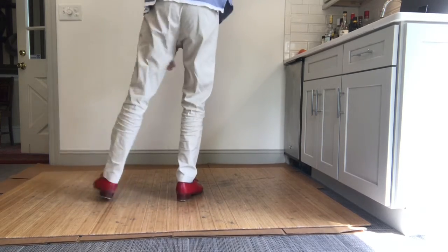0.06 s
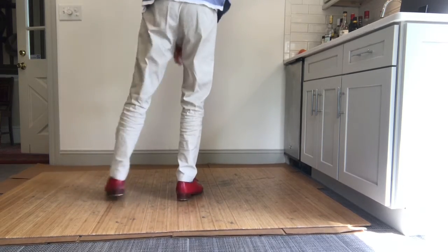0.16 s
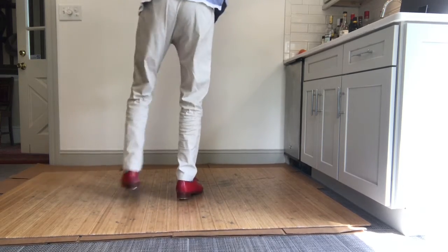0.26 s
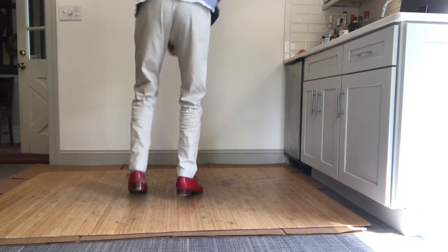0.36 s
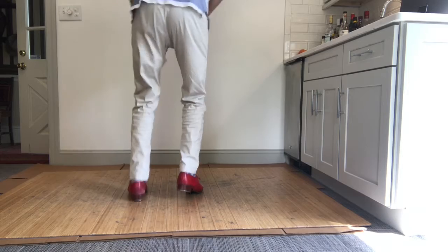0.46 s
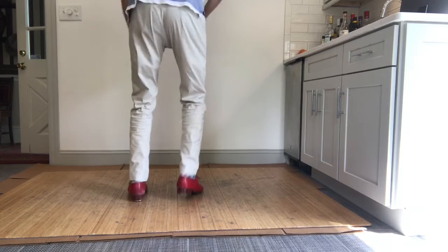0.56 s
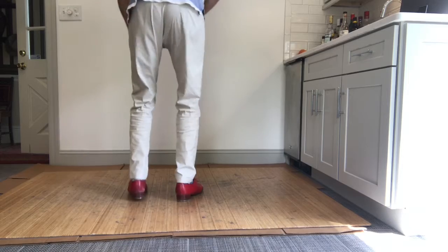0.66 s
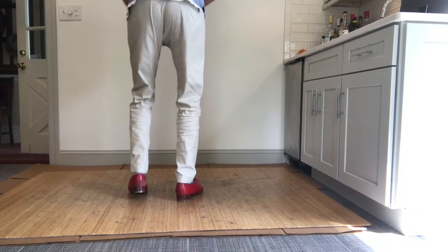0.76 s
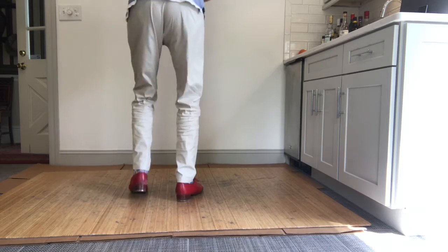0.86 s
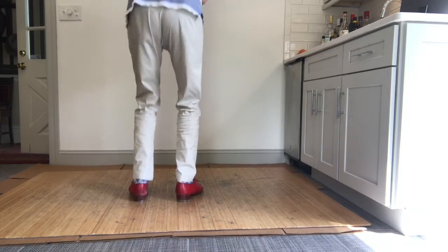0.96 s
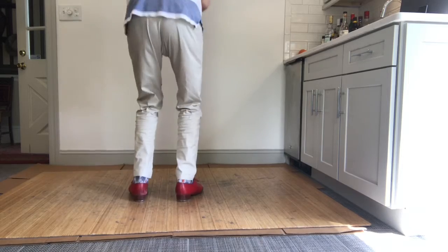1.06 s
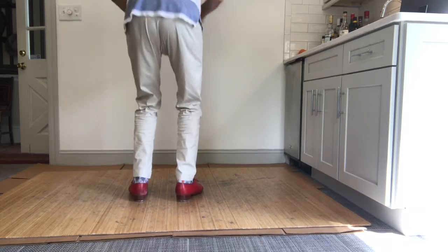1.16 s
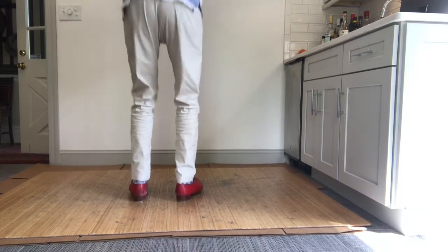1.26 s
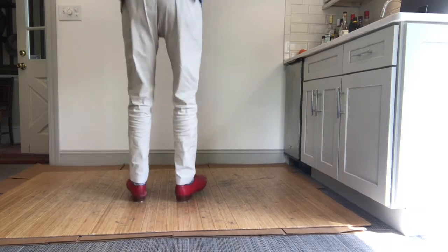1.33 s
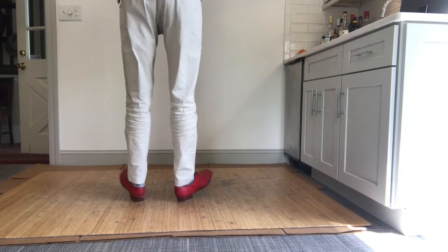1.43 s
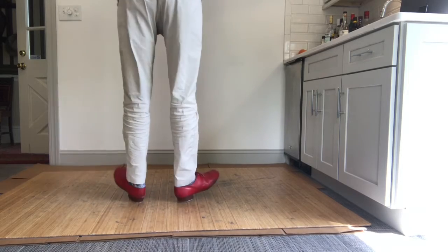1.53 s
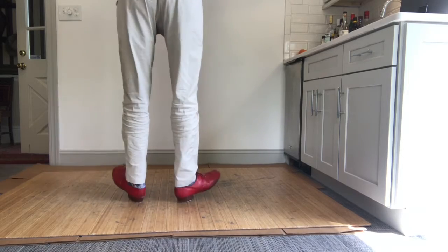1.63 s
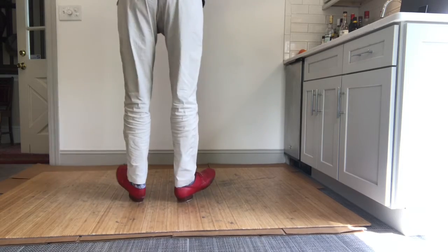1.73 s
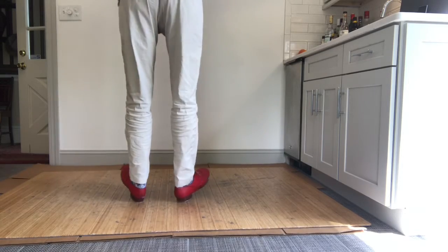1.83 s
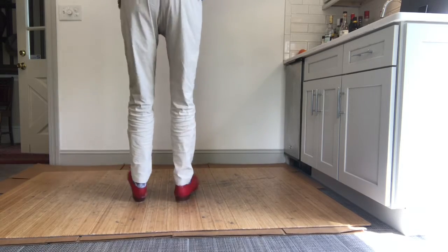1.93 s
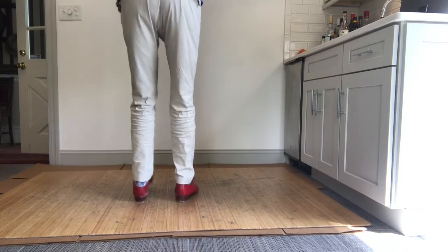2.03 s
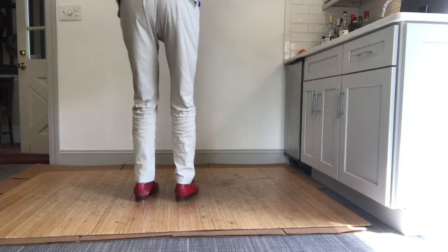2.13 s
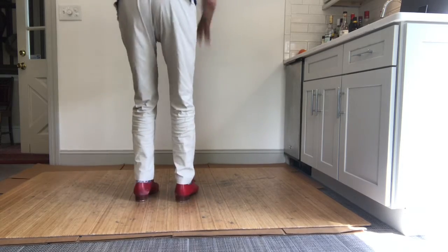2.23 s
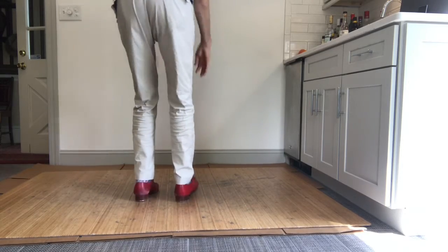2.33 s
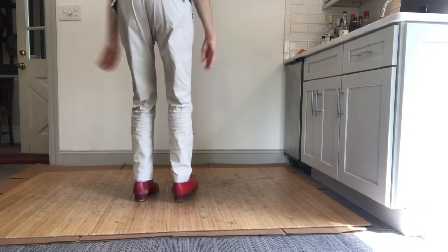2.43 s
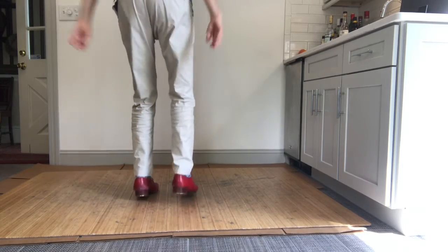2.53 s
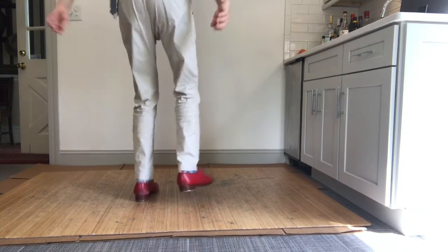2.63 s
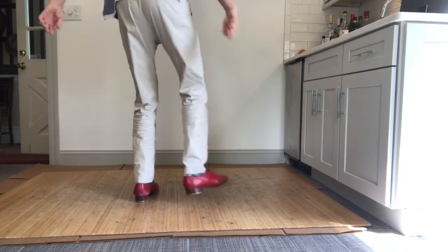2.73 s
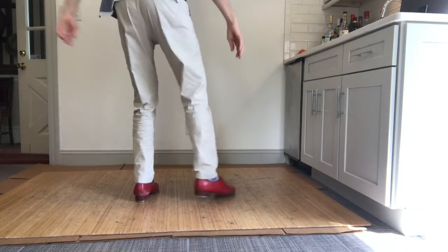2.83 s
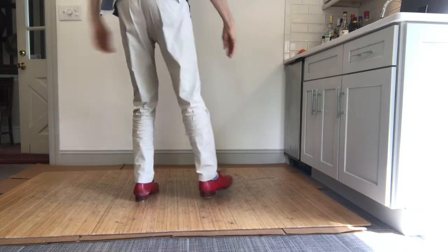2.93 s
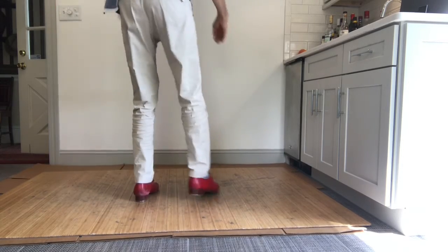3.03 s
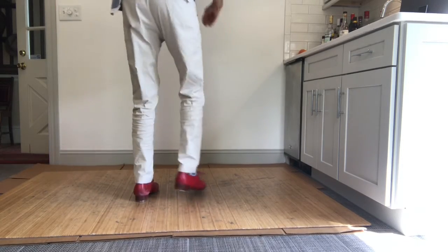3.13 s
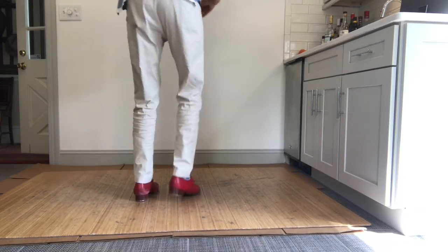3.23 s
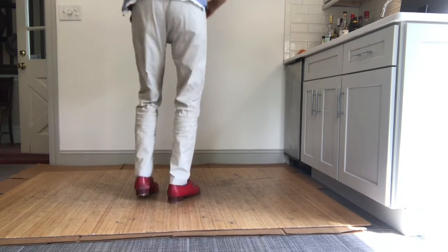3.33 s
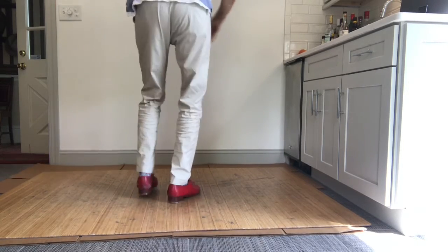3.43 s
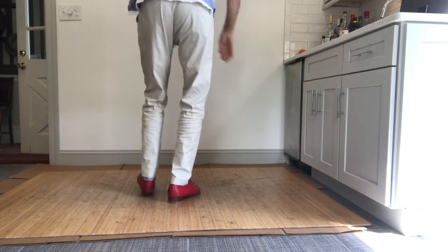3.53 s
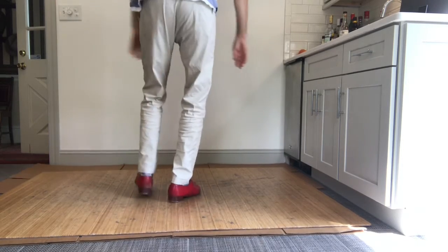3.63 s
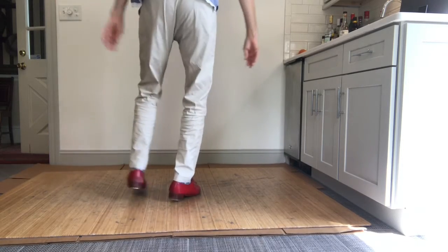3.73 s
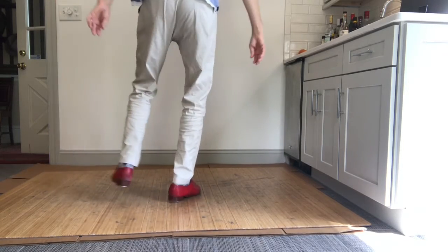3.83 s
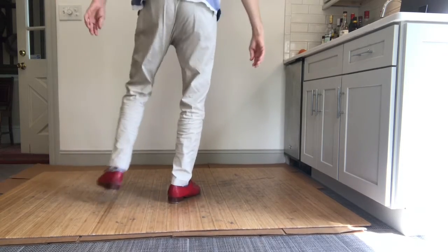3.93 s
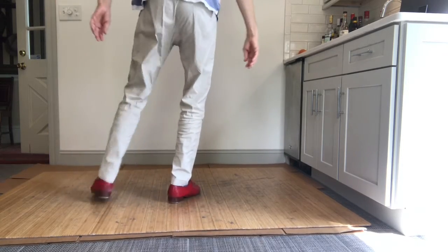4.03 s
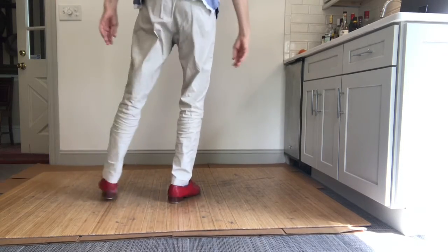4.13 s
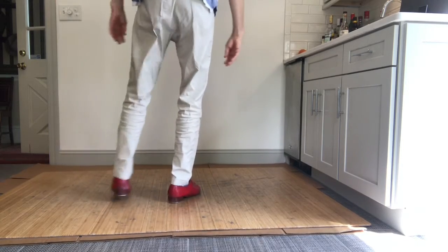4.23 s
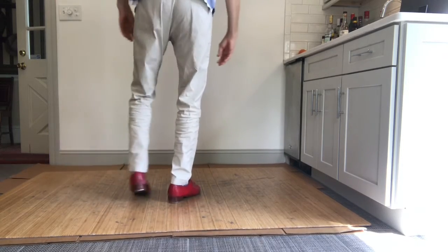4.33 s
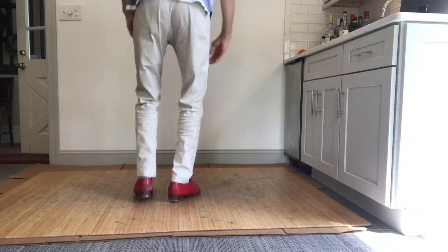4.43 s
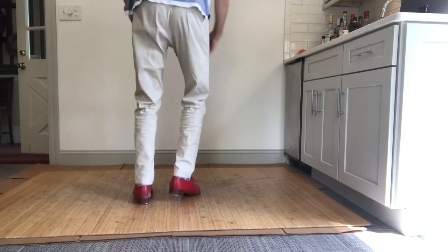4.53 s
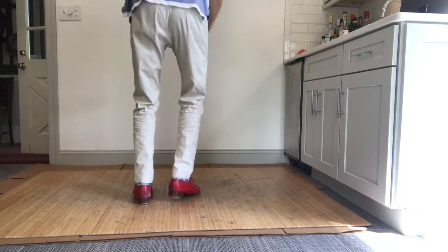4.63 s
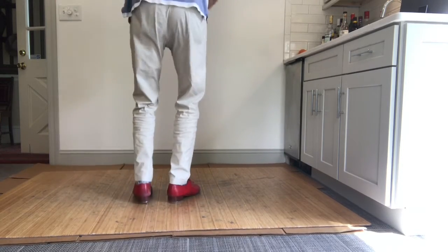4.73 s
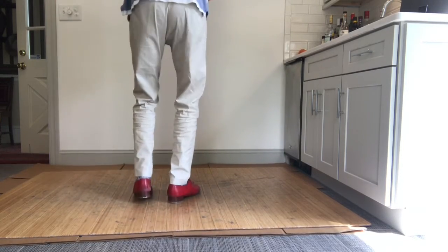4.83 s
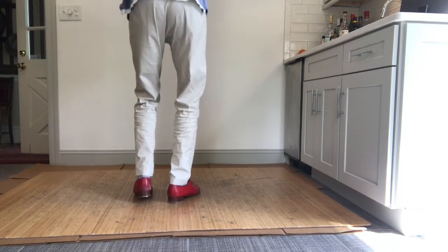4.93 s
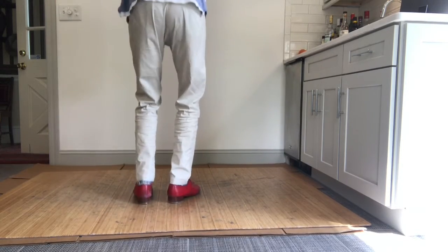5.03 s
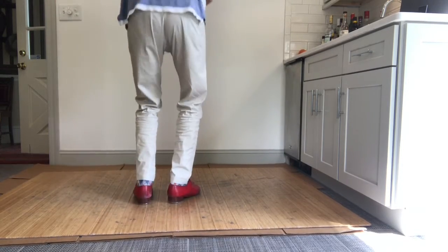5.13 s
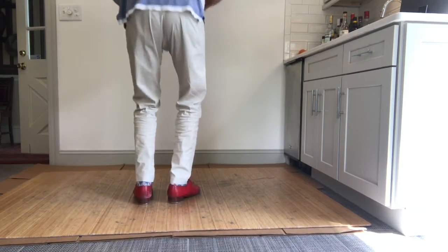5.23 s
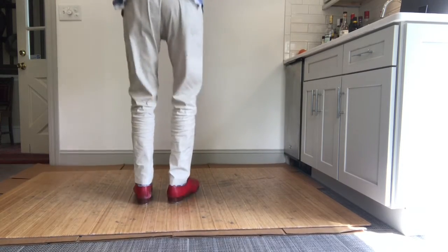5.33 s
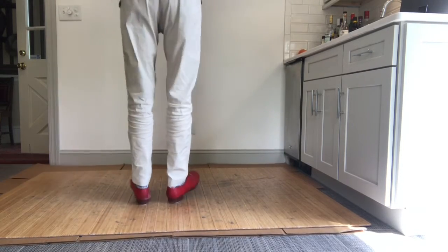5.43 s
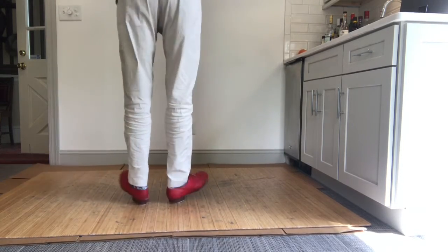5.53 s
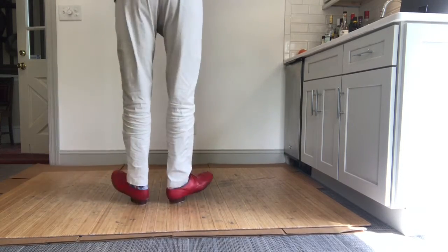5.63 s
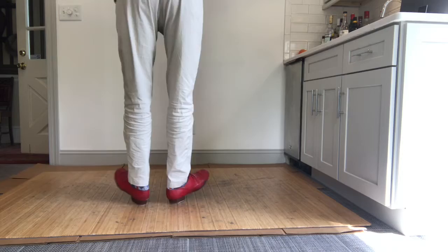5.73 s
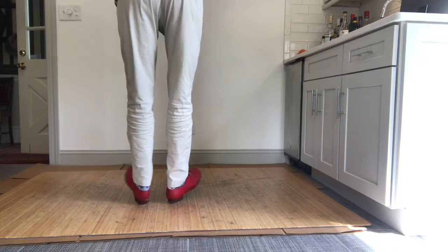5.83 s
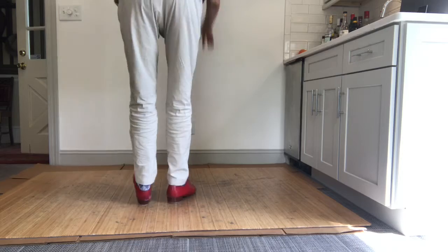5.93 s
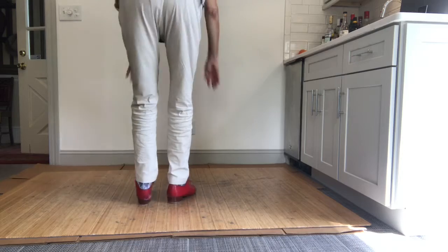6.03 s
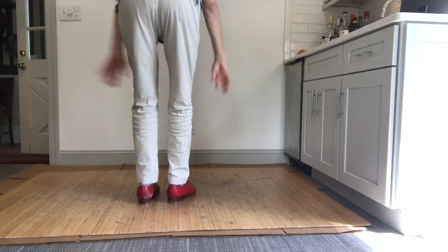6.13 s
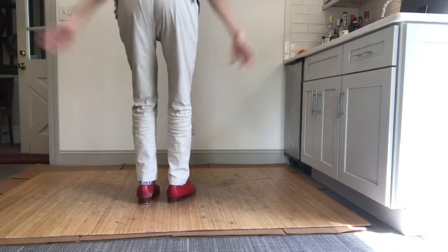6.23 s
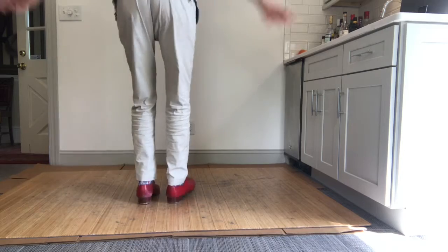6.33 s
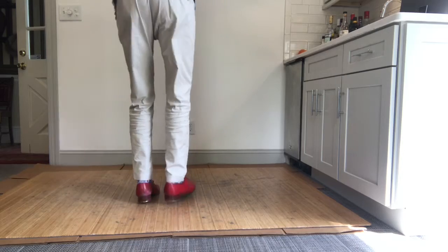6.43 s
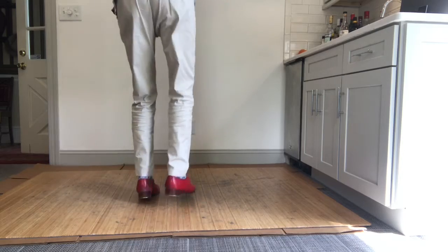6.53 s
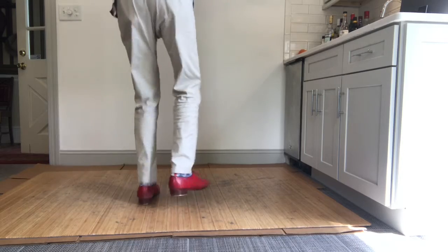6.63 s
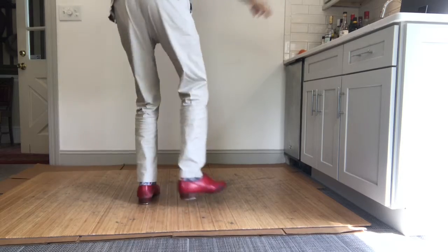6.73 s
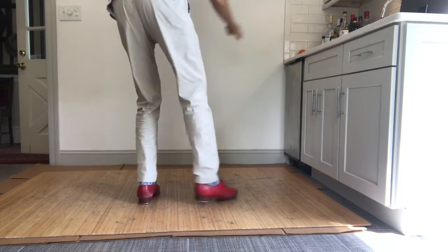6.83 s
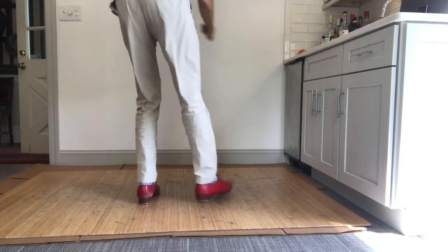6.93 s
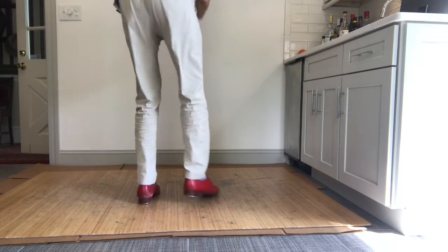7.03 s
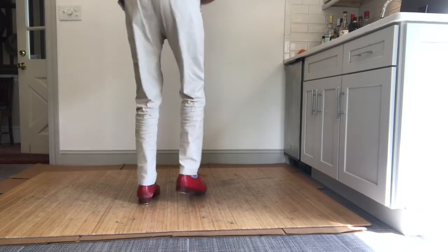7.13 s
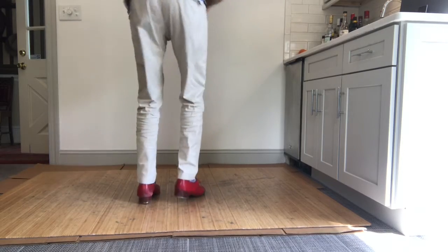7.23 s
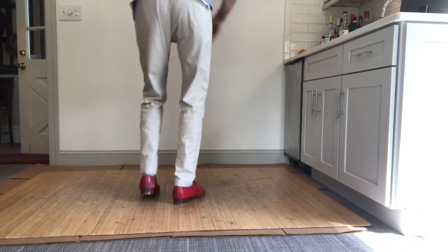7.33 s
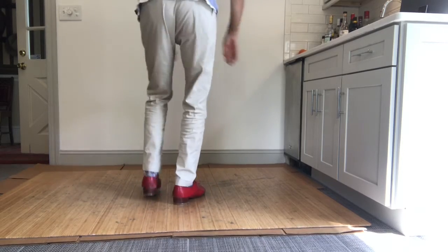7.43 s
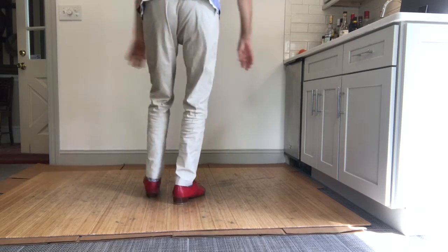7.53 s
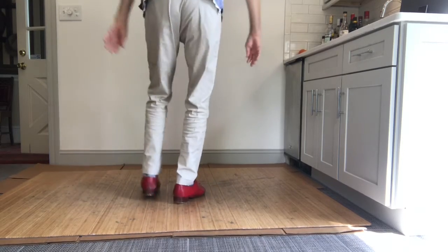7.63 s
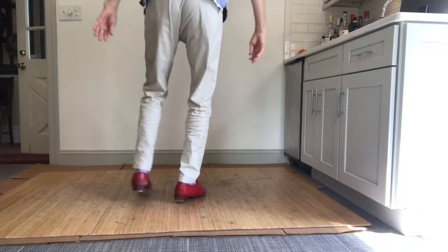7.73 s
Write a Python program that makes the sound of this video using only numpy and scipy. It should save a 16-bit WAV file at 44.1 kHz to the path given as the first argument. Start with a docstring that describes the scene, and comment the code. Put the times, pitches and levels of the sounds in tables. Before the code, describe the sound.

In a hard-walled kitchen, a dancer's steel-plated shoes clatter on wood a few metres from the microphone. A short run of taps gives way to soft ticking and scraping, then comes a longer, even run. After another pause of scraping soles and one slight squeak, the tapping resumes. Heel drops thump the floor, and each tap rings briefly in the room over quiet air and an appliance hum.

```python
"""Tap shoes clatter on a slatted wooden mat in a hard-walled kitchen, a few metres away.
Each impact excites damped modes: the steel plate chatters, the slats knock, and heavy steps shake
the floor joists. In the pauses the shoes swivel: the plates tick, and friction makes the soles
scrape and once squeak. The walls return the taps and ticks as echoes and reverberation, over a
murmur of air and a faint mains hum."""
import sys
import numpy as np
from scipy import signal
from scipy.fft import rfft, irfft, next_fast_len
from scipy.io import wavfile
from scipy.ndimage import uniform_filter1d

SR = 44100
rng = np.random.default_rng(int(sys.argv[2]) if len(sys.argv) > 2 else 0)


def wrap_up_sound(samples):
    """Save the sound to the file named by the first command line argument, as 16-bit audio."""
    columns = np.atleast_2d(samples).T
    # keep every value between -1 and 1, then stretch to whole-number steps
    tamed = np.clip(columns, -1, 1)
    steps = np.round(tamed * 32767).astype(np.int16)
    wavfile.write(sys.argv[1], SR, steps)


N = 343098

# Blows of the shoes. Each row: start in seconds, clank in Hz, clack in Hz, level in dB; then, with
# dB relative to that level, clack in dB, mat in dB, slat in dB and Hz, sole in dB and Hz, ring in
# dB and Hz, edge in dB; last, the weight on the floor in dB, independent of that level.
TAPS = [(-.14, 3900, 700, -7.5, -3, -16, -11, 690, -1.5, 1500, 2, 5870, -13, -50),
        (0.0339, 4250, 1050, -7.5, -6, -17.5, -6.5, 980, -35, 1290, -0.5, 5940, -5.5, -41),
        (.199, 4130, 785, -7, -5.5, -19, -15, 740, -10, 2180, 0, 5850, -11, -41),
        (0.3795, 4070, 590, -8.5, -14, -13, -6, 724, -3.5, 2230, 7.5, 5730, -8, -33),
        (0.5266, 4070, 770, -10, 3.5, -36, -1, 610, 0.5, 1490, 1, 6100, -12, -33),
        (0.6614, 3710, 1200, -7.5, -15, -17, -1, 1080, -11, 1330, 3.3, 5790, -10.5, -24.5),
        (1.0029, 3820, 710, -15, 8.5, -11, 7.5, 608, 6.5, 1340, 1.5, 5970, -17, -32),
        (2.011, 3920, 1050, -11, 4.5, -4.5, -13, 604, 1.5, 1254, -2, 5800, -18.5, -17),
        (2.177, 3400, 950, -31.5, 17.5, 7, 8, 695, 5, 1456, 2, 6170, -8.5, -21),
        (2.5245, 3920, 800, -7.5, 7, -9.5, -4.5, 599, -2, 1123, -0.5, 6030, -9, -23.5),
        (2.6926, 4500, 830, -12.5, 4, -24, -2.5, 880, -0.2, 1130, 1.5, 6160, -12, -25),
        (2.8708, 4500, 780, -7.5, -3, -17.5, -16.5, 877, -7, 1350, -1, 6500, -9, -32),
        (3.054, 3630, 630, -17.5, 1, -10.5, -1.5, 620, -2, 1230, 4.2, 5900, -8, -29.5),
        (3.225, 3350, 730, -9.5, 2, -13, -5, 563, -2.5, 1153, 1.5, 5600, -5.5, -33),
        (3.3662, 3140, 620, -20, -2, -11, 3.5, 583, 3, 1828, 6, 5700, -8, -42),
        (3.543, 3300, 580, -12, -5, -33, 1.5, 560, 4, 1767, 3, 5730, -13.5, -45),
        (3.7329, 4300, 710, -6.5, -6.5, -18.5, -5, 670, -8, 2080, 1, 5700, -14, -37),
        (3.8842, 3160, 1020, -17.5, 4.5, -34, 2, 778, 5.5, 1747, 0, 5670, -35, -38),
        (4.0504, 4330, 1020, -10.5, -2, -14.5, -20, 1106, -3, 1500, -1.3, 6100, -9.5, -41),
        (4.2322, 4170, 790, -15, 3, -11.5, -4.5, 572, -1.5, 1250, -5, 6600, -12.5, -52),
        (4.3987, 4100, 730, -9, -13, -18, -14, 634, -9, 2100, 3.5, 5570, -14.5, -39),
        (4.566, 3470, 860, -13, 7.5, -42, -2.5, 886, 3, 1340, 7, 5500, -8.5, -35),
        (4.734, 3400, 705, -17.5, 5, -12.5, 6.5, 585, 8.5, 1430, 5, 5840, -4.5, -26),
        (5.0962, 3560, 650, -13.5, 3.5, -12.5, -2, 534, 3, 1230, 4.5, 5570, -9, -30),
        (5.987, 3880, 500, -10.5, 2, -5, -25, 540, -1.5, 1160, -0.5, 5980, -15, -15),
        (6.1753, 4080, 700, -29, 10, 3, 8, 776, 8, 1210, 0, 5800, -15, -43),
        (6.1854, 4060, 545, -21.5, 13.5, -0.5, -1, 616, -8, 1340, 3, 5400, -17, -23.5),
        (6.5294, 3630, 910, -6, 5.5, -14.5, -8.5, 830, -4.5, 1262, -1, 5840, -13, -32),
        (6.678, 3870, 890, -12, 5.5, -14, 4, 799, -32, 995, 11, 5460, -5, -25),
        (6.8606, 3870, 540, -11.5, -11, -17.5, -4, 540, -5, 1385, 5, 5740, -7.5, -31),
        (7.0392, 4100, 573, -11.5, 4, -11, -5, 560, 0, 1190, 4.5, 5700, -5.5, -37),
        (7.216, 3460, 510, -8.5, -1, -17.5, -15, 547, -26, 2140, -0.5, 6100, -7.5, -28.5),
        (7.368, 4100, 1450, -10.5, -10, -16, -8, 1030, 1.5, 1720, 1.5, 5740, -15, -28),
        (7.5447, 3710, 880, -6, -8, -28, -4.5, 753, -4, 1800, 2.5, 5600, -16, -36),
        (7.7182, 4130, 760, -7, -20, -17.5, -6, 650, -31, 1340, 6.5, 5470, -12.5, -32)]
# Modes of the mat, the plate's edge, its highest tones and its body.
# Each row: frequency in Hz, 60 dB decay time (T60) in seconds, delay in seconds.
MAT_MODES = [(235.4, 0.087, 0.0017), (365, 0.034, 0.00217), (453, 0.021, 0.00093), (558, 0.027, 0.0012)]
EDGE_MODES = [(8000, .003, .001), (9500, .004, .0006)]
SIZZLE_MODES = [(11400, .0033, .0013), (13200, .0024, .0018)]
PLATE_MODES = [(4100, .003, 0), (3100, .002, .0035)]
SOLE_MODE = (2150, .005, .0008)
HEEL_DB = -11.5  # a mat level above this is a heel drop


def taps():
    """Impact excitation: the steel plate rings first, then the wooden slats beneath it."""
    out = np.zeros(N + 2 * SR)
    for (start, clank_hz, clack_hz, db, clack_db, mat_db, slat_db, slat_hz,
         sole_db, sole_hz, ring_db, ring_hz, edge_db, _) in TAPS:
        steel = np.vstack([
            damped_modes([(sole_hz, .008, .0005), SOLE_MODE], sole_db),
            clank(clank_hz, 7.5),
            damped_modes(PLATE_MODES, -1.5, detune=.086),
            damped_modes([(ring_hz / 1.127, .0021, .0006), (ring_hz * 1.096, .0021, .0009)], ring_db),
            damped_modes(EDGE_MODES, edge_db),
            damped_modes(SIZZLE_MODES, edge_db - 1.5),
            *pings(start)])
        knock = damped_modes([(slat_hz, .012, .0016), (1.19 * slat_hz, .008, .0016)], slat_db)
        free_slats = [(slat_hz, .05, .0016), (1.545 * slat_hz, .04, .0016), (2.15 * slat_hz, .03, .0016)]
        hollow = damped_modes(free_slats, slat_db - 15.5, spread_db=5, detune=.096)
        wood = np.vstack([damped_modes(MAT_MODES, mat_db), knock, hollow])
        clatter = chatter(rocking(steel, start)).sum(axis=0)
        add(out, start, amp(db) * echoes(clatter, WALL_ECHOES))
        clack = damped_modes([(clack_hz, .0065, .0019)], clack_db)  # the slat slaps down once
        add(out, start, amp(db) * echoes(clack[0], WALL_ECHOES))
        add(out, start, amp(db - .5) * echoes(wood.sum(axis=0), FLUTTER_ECHOES))
        wet_db = -29 + .51 * max(mat_db - HEEL_DB, 0)  # a heel drop fills the room more
        add(out, start, amp(db) * reverberation(np.vstack([steel, wood, amp(-6) * clack]), wet_db))
    return radiated(out[:N])


def clank(hz, db):
    """A heavily damped mode gives the plate a brief pitch."""
    return damped_modes([(hz, .003, .0009)], db)


def chatter(modes):
    """Repeated contact: a tilted plate makes growing touches, then slaps down; energy is conserved."""
    touches = .2 * rng.standard_normal(40) * (np.arange(40) / 40) ** 2
    touches[-1] = 1
    spread = signal.fftconvolve(modes, touches[None], axes=1)[:, :modes.shape[1]]
    return spread * np.linalg.norm(modes) / np.linalg.norm(spread)


# Taps that land twice. Each row: start in seconds, gap in seconds, second touch in relative dB.
DOUBLE_LANDINGS = [(.6615, 0.00049, -11), (1.0031, 0.002, -28), (3.8845, 0.0017, 1), (4.567, 0.0015, 0),
                   (5.0964, 0.0016, 2), (6.6786, .00083, -4), (7.5449, 0.0012, -7)]


def rocking(modes, start):
    """Superposition: a plate rocking from edge to edge adds a delayed copy of its sound."""
    for at, gap, db in DOUBLE_LANDINGS:
        if abs(at - start) < .02:
            second = np.pad(modes, ((0, 0), (round(gap * SR), 0)))[:, :modes.shape[1]]
            return (modes + amp(db) * second) / np.hypot(1, amp(db))
    return modes


# Narrow plate tones. Each row: contact time in seconds, frequency in Hz, dB relative to the contact.
PINGS = [(.5268, 7140, -13), (.5268, 9555, -21), (.5268, 9790, -24), (.5268, 6200, -9), (.6614, 3770, -32),
         (.6614, 5970, -12), (.6614, 7095, -19), (.6614, 8350, -32), (.6614, 9700, -27), (.6614, 9800, -21),
         (1.0031, 2680, -10), (1.0031, 5577, -9), (1.0031, 7540, -21), (1.0031, 9800, -24),
         (1.385, 4650, -1), (1.466, 4350, -12), (1.582, 2350, 7), (2.011, 3840, -22), (2.1774, 4000, -15),
         (2.6926, 3600, -10), (2.6926, 4710, -18), (2.6926, 5540, -18), (3.225, 5636, -9),
         (3.3668, 5894, -9), (3.5438, 4170, -10), (3.8853, 3770, -12), (3.8853, 5550, -4.5),
         (3.8853, 8100, -32), (4.2317, 6600, -10), (4.567, 3350, -26), (4.567, 5530, -10),
         (4.567, 5873, -12), (4.734, 2250, -9), (5.0964, 1680, -11), (5.0964, 5770, -14), (6.454, 2280, 3),
         (6.454, 3900, -1), (6.501, 2300, 9), (6.501, 5800, 1), (6.678, 5800, -2.5), (6.678, 6270, -4),
         (6.678, 7200, -7.5), (7.368, 3805, -17), (7.368, 5300, -17), (7.5448, 3670, -10),
         (7.7181, 2740, -20), (7.7181, 4130, -15), (7.7181, 7100, -26)]


def pings(start):
    """Lightly damped plate modes ring on after some contacts."""
    return [damped_modes([(hz, .028, .001)], db, detune=0)
            for at, hz, db in PINGS if abs(at - start) < .01]


# Modes of the floor. Each row: frequency in Hz, T60 in seconds, delay in seconds.
JOIST_MODES = [(37.3, .43, .029), (59.3, .44, .021)]
BOARD_MODES = [(88.8, .22, .015)]
THUD_MODES = [(138, .14, .0067), (189, .099, .0059)]


def floor():
    """Structural resonance: the floor's low modes swell as the weight of each step comes down."""
    out, t = np.zeros(N + SR), np.arange(SR // 2) / SR
    for start, _, _, _, _, mat_db, *_, weight_db in TAPS:
        thud_db = -16.5 + .58 * weight_db + .43 * max(mat_db - HEEL_DB, 0)
        parts = (JOIST_MODES, weight_db - 8.5, .05), (BOARD_MODES, weight_db, .04), (THUD_MODES, thud_db, .02)
        for modes, db, rise_s in parts:
            swell = 1 - np.exp(-(t / rise_s) ** 2)
            add(out, start, damped_modes(modes, db, size=len(t)).sum(axis=0) * swell)
    return out[:N]


# Light touches. Each row: start in seconds, level in dB, click in Hz, slat in relative dB.
TICKS = [(1.288, -45, 4000, -20), (1.385, -56, 4600, -20), (1.4405, -46, 3000, -15), (1.466, -38, 4140, 7),
         (1.582, -56, 3000, 8), (1.635, -36, 3880, -11), (1.666, -30, 3300, 1), (1.751, -37, 3600, -24),
         (1.912, -55, 2500, 3), (1.978, -44, 2950, 19), (2.419, -48, 3880, 0), (2.471, -41, 4500, 1),
         (5.476, -48, 3000, -8), (5.499, -39.5, 2960, 10), (5.683, -45, 3800, -17),
         (5.718, -35.5, 3000, 6.5), (5.762, -31, 3670, -7), (5.813, -33, 4140, -2), (5.838, -32, 3270, -1),
         (5.888, -32.5, 4030, 8), (6.455, -43.5, 2440, 20), (6.501, -44.5, 2510, 18)]
# The ring of a tick. Each row: frequency in Hz, T60 in seconds, delay in seconds.
TICK_MODES = [(5500, .0025, 0), (6800, .0025, 0)]


def ticks():
    """Light impacts: plates brushing over slat edges excite the steel and a little wood."""
    out = np.zeros(N + SR)
    for start, db, hz, slat_db in TICKS:
        click = np.vstack([
            damped_modes([SOLE_MODE], -15),
            clank(hz, 3.7),
            damped_modes(TICK_MODES, -7.5),
            damped_modes(EDGE_MODES + SIZZLE_MODES, -17),
            damped_modes([(860, .0027, .00116)], slat_db),
            *pings(start)])
        add(out, start, amp(db) * echoes(click.sum(axis=0), WALL_ECHOES))
        add(out, start, amp(db) * reverberation(click, wet_db=-30))
    return radiated(out[:N])


# Two swivels, a list for each. Each row: time in seconds, grit level in dB, rub level in dB.
SWIVELS = [
    [(1.4, -68, -78), (1.47, -66.5, -60), (1.55, -97, -81), (1.66, -48.5, -55), (1.72, -52, -55),
     (1.8, -79, -86), (1.98, -89, -87)],
    [(5.35, -72, -48), (5.45, -81, -53), (5.55, -76.5, -50), (5.68, -75, -50), (5.75, -50, -49),
     (5.85, -45, -59), (5.92, -51, -67), (5.97, -67, -66)],
]
# Spectra of scraping and dragging soles. Each row: frequency in Hz, relative density in dB.
GRIT_SPECTRUM = [(200, -40), (500, 8), (1000, -1), (2000, 2), (4000, -6), (6500, -9), (9000, -19),
                 (16000, -25)]
RUB_SPECTRUM = [(150, -13), (300, -4), (400, 2.5), (520, -11), (660, 4), (800, -11), (1100, -16),
                (1800, -47), (4000, -62.5)]


def scrape():
    """Sliding friction: grit of very uneven size crackles under the turning soles, over a dull rub."""
    noise = rng.standard_normal(N)
    grain_db = 7.3 * np.minimum(rng.exponential(size=N // 64 + 1), 2.6)
    grains = noise * amp(np.repeat(grain_db, 64)[:N])
    grit = coloured(grains + 3 * rng.standard_normal(N), GRIT_SPECTRUM)
    rub = coloured(rng.standard_normal(N), RUB_SPECTRUM)
    return sum(grit * envelope(rows, column=1) + rub * envelope(rows, column=2) for rows in SWIVELS)


# The course of the squeak. Each row: time in seconds, level in dB, frequency in Hz.
SQUEAK = [(5.83, -75, 1600), (5.85, -58, 1720), (5.9, -50, 1850), (5.93, -70, 2000)]


def squeak():
    """Friction of a turning sole gives a rising tone, roughened by random amplitude modulation."""
    times, _, hz = np.transpose(SQUEAK)
    roughness = 1 + .8 * unit(uniform_filter1d(rng.standard_normal(N), size=300))
    pitch_hz = np.interp(np.arange(N) / SR, times, hz)
    return envelope(SQUEAK, column=1) * roughness * np.sin(2 * np.pi * np.cumsum(pitch_hz) / SR)


# First echoes of the clicks, and of lower tones bouncing between facing walls.
# Each row: delay in seconds, level in dB relative to the direct sound.
WALL_ECHOES = [(.0053, -10.5), (.0062, -10.5), (.0092, -11), (0.0125, -18.5), (0.0141, -28), (0.0174, -27)]
FLUTTER_ECHOES = [(.0055, -8), (0.014, -13.5), (0.021, -11.5), (.025, -10.5), (.031, -9)]


def echoes(x, reflections):
    """Early reflections follow the direct sound, shifting a little as the feet move."""
    path = np.zeros(4096)
    path[0] = 1
    for delay, db in reflections:
        gain = amp(db + rng.normal(0, .77)) * rng.choice([-1, 1])
        arrival = delay + delay * rng.normal(0, .05)
        path[int(arrival * SR)] = gain
    return np.convolve(x, path)


# The kitchen's diffuse field. Each row: frequency in Hz, T60 in seconds, relative level in dB.
KITCHEN_DECAY = [(155, 0.65, -8.5), (450, 0.45, 4), (1150, 0.69, 1), (3650, 0.6, -6), (7160, 0.57, 0),
                 (11140, 0.36, -2), (15830, 0.36, -2.5)]


def reverberation(modes, wet_db):
    """Modes radiate in unlike directions, so their powers add; each band decays at its own rate."""
    power = np.sum(np.abs(rfft(modes)) ** 2, axis=0)
    cepstrum = irfft(np.log(power + 1e-12) / 2)
    cepstrum[1:2048] *= 2
    cepstrum[2049:] = 0
    blow = irfft(np.exp(rfft(cepstrum)))  # minimum-phase pulse with that power spectrum
    bands, t60, db = np.transpose(KITCHEN_DECAY)
    hz, t, noise = signal.stft(rng.standard_normal(32000), SR, nperseg=256)
    decay_db = log_interp(bands, db, hz)[:, None] - 60 * t / log_interp(bands, t60, hz)[:, None]
    tail = signal.istft(noise * amp(decay_db), SR, nperseg=256)[1]
    build_up = np.clip((np.arange(len(tail)) / SR - .002) / .006, 0, 1)
    return signal.fftconvolve(blow, tail * amp(wet_db) * build_up)


# The murmur of air. Each row: frequency in Hz, relative density in dB.
AIR_SPECTRUM = [(15, -31), (30, -2), (60, -9), (115, 1), (175, -10.5), (260, -15), (400, -9.5), (700, -11),
                (1100, -14), (2000, -18.5), (3000, -22), (6400, -28.5), (9000, -36.5), (16000, -41)]
# An appliance's mains hum. Each row: frequency in Hz, peak level in dB.
MAINS_HUM = [(58, -62), (116, -64)]


def house():
    """Ambient noise: a broadband murmur of air under two faint harmonics of hum."""
    hum = sum(amp(db) * np.sin(2 * np.pi * hz * np.arange(N) / SR) for hz, db in MAINS_HUM)
    return amp(-53) * coloured(rng.standard_normal(N), AIR_SPECTRUM) + hum


def damped_modes(modes, db, spread_db=1.2, detune=.015, size=4096):
    """Free vibration: one decaying sine per mode, its strength and pitch varying with each blow."""
    out = np.zeros((len(modes), size))
    for k, (hz, t60, delay) in enumerate(modes):
        onset = int(delay * SR)
        t = np.arange(size - onset) / SR
        pitch_hz = hz * (1 + detune * rng.standard_normal())
        ring = amp(-60 * t / t60) * np.sin(2 * np.pi * pitch_hz * t)
        out[k, onset:] = (-1) ** k * amp(db + rng.normal(0, spread_db)) * ring
    return out


def radiated(x):
    """Radiation efficiency: narrow slats and small plates give off almost no bass."""
    return signal.sosfilt(signal.butter(4, 300, "high", fs=SR, output="sos"), x)


def amp(db):
    """Decibels as an amplitude ratio."""
    return 10 ** (np.asarray(db) / 20)


def unit(x):
    """Normalisation to rms 1."""
    return x / np.sqrt(np.mean(x ** 2) + 1e-20)


def log_interp(bands, values, hz):
    """Interpolation on a log frequency axis."""
    return np.interp(np.log(hz + 1), np.log(np.asarray(bands) + 1), values)


def envelope(rows, column):
    """A dB column as a gain over time, silent outside its span."""
    columns = np.transpose(rows)
    return amp(np.interp(np.arange(N) / SR, columns[0], columns[column], -120, -120))


def filtered(x, response):
    """Linear filtering: the spectrum times a frequency response."""
    size = next_fast_len(N + 8192)
    return irfft(rfft(x, size) * response(np.fft.rfftfreq(size, 1 / SR)), size)[:N]


def coloured(x, spectrum):
    """Spectral shaping by (Hz, dB) points, at rms 1."""
    return unit(filtered(x, lambda hz: amp(log_interp(*np.transpose(spectrum), hz))))


def add(out, start, x):
    """Mixes x in at start seconds, dropping what falls before zero."""
    i = round(start * SR)
    out[max(i, 0):i + len(x)] += x[max(-i, 0):]


def scene():
    """Superposition: all sources sum in one channel."""
    return (taps() + floor() + ticks() + scrape() + squeak() + house())[None]


# Bands shaded by the microphone housing. Each row: centre in Hz, width in Hz, depth from 0 to 1.
HOUSING_NOTCHES = [(3107, 260, 0.31), (5030, 390, 0.35), (10340, 350, 0.37)]


def record(dry):
    """Notches shade narrow bands, saturation rounds the loudest clicks, a low-pass limits the band."""
    def housing(hz):
        return np.prod([1 - depth * 1j * hz * width / (centre ** 2 - hz ** 2 + 1j * hz * width)
                        for centre, width, depth in HOUSING_NOTCHES], axis=0)

    shaded = filtered(dry[0], housing)
    rounded = shaded / (1 + np.abs(shaded / 1.1) ** 6) ** (1 / 6)
    return filtered(rounded, lambda hz: amp(-np.clip(hz - 15900, 0, 1100) / 60) * (hz < 16990))[None]


dry = scene()
out = record(dry)
wrap_up_sound(out)
```